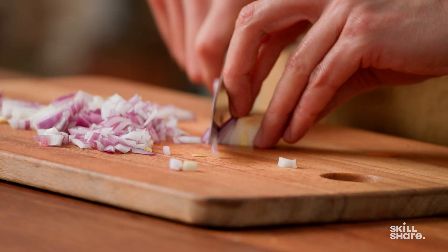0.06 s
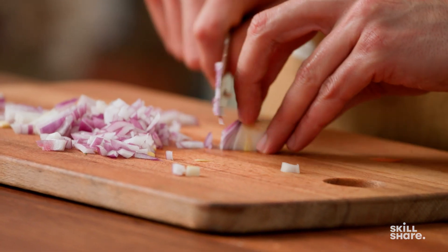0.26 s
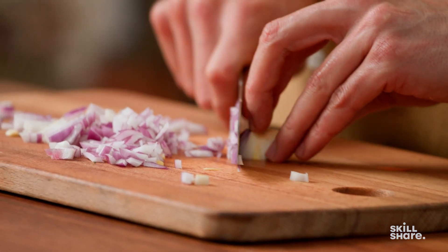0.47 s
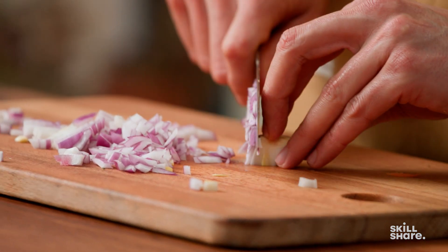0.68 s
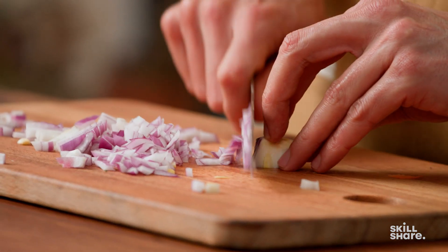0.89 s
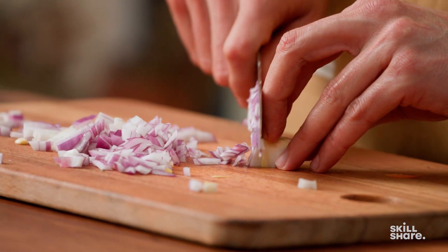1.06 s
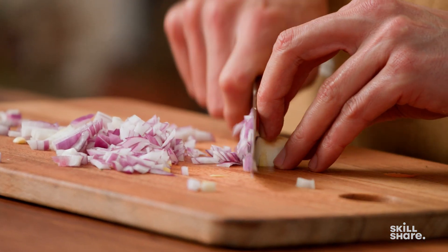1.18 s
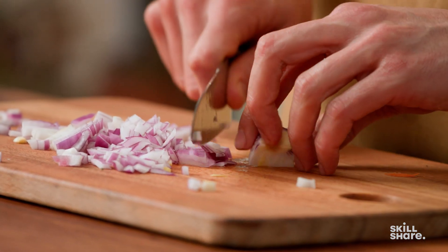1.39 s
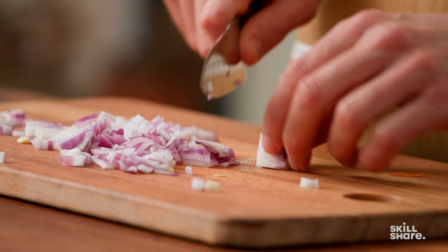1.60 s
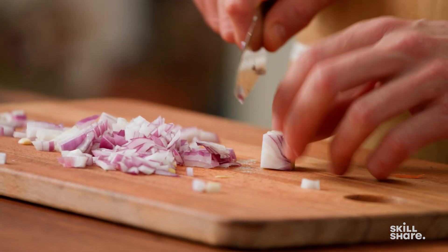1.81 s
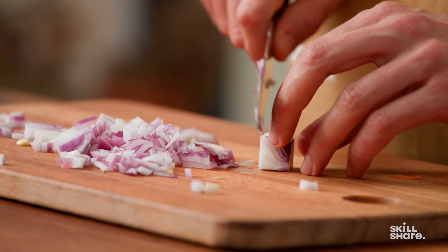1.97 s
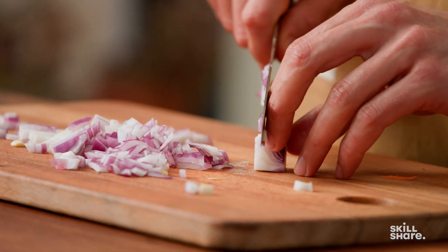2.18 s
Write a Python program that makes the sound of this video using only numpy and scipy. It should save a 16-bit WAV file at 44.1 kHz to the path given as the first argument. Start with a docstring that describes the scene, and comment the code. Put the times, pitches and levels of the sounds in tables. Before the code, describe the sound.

A knife chops an onion on a wooden board, heard close in a small live kitchen. Faint crackles at 0.1 s, then wet crunches swell into sharp, woody knocks at about 0.21, 0.58, 0.93 and 1.28 s, with low table thuds, weakest on the last, which has the hardest, brightest click. Short echoes fade; tiny crackles near 1.37 and 2.2 s over faint hiss and wavering rumble.

```python
"""Over a wavering low rumble and faint hiss, both filtered noise, a knife slices an onion in four strokes.
Before the first knock small crackles open the scene; others come between the strokes and after the last.
In each stroke the wet crunch, a dense train of clicks, swells while a low thud of two table modes starts.
Then tip and heel knock on the wooden board: two wavelets, a bright tick and ringing board modes.
After every knock come short echoes, a decaying diffuse tail and the resonances of a small live room."""
import sys
import numpy as np
from scipy import signal
from scipy.fft import rfft, irfft
from scipy.io import wavfile
from scipy.ndimage import uniform_filter1d

SR = 44100
rng = np.random.default_rng(int(sys.argv[2]) if len(sys.argv) > 2 else 0)


def waveform_to_disk(signal):
    """Save audio, clipped to [-1, 1], as 16-bit WAV at the path in sys.argv[1]."""
    frames = np.transpose(np.atleast_2d(signal))
    scaled = np.clip(frames, -1, 1) * 32767
    samples = np.round(scaled).astype(np.int16)
    wavfile.write(sys.argv[1], SR, samples)


N = 99225
T = np.arange(N) / SR  # time, s


def amp(db):
    """Decibel scale: 20 dB is a factor of ten in amplitude."""
    return 10 ** (np.asarray(db) / 20)


def unit(x):
    """Normalisation: scale to an rms of 1."""
    return x / np.sqrt(np.mean(x ** 2))


def at_hz(points, hz):
    """Logarithmic pitch axis: interpolate (pitch_hz, value) points along it."""
    pitch, value = np.array(points, float).T
    return np.interp(np.log(np.maximum(hz, 1)), np.log(pitch), value)


def convolve(x, response):
    """Linear superposition: every sample of x launches a copy of the response."""
    return signal.fftconvolve(x, response)[:N]


def colour(x, points, size=8192):
    """Minimum phase: a causal filter of unit power follows from the spectrum by folding its cepstrum."""
    log_gain = np.log(amp(at_hz(points, np.fft.rfftfreq(size, 1 / SR))))
    cepstrum = irfft(log_gain)
    cepstrum[1:size // 2] *= 2
    cepstrum[size // 2 + 1:] = 0
    response = irfft(np.exp(rfft(cepstrum)))
    return convolve(x, response / np.linalg.norm(response))


def decay(age, t60):
    """Exponential damping: the level falls 60 dB in t60 seconds."""
    return np.exp(-np.log(1000) * age / t60)


def ring(modes):
    """Modal superposition: an impulse response of damped cosines, cut off after a second."""
    t = T[T < 1]
    out = sum(amp(db) * decay(t, t60) * np.cos(2 * np.pi * hz * t) for hz, db, t60 in modes)
    return np.pad(out, (0, N - len(t)))


# The four strokes; the knife meets the board at start_s. Hardness 1 is a usual contact.
# Columns: start_s, knock_level_db, hardness (ratio), crunch_level_db, thud_level_db; levels are relative
CHOPS = [(0.2095, 1.5, 0.94, 5, -1.5), (0.5758, 1.54, 1.054, 6, -0.5), (0.9264, 0, 0.93, 3, -4.5),
         (1.2793, 1.5, 1.213, 3, -12)]
PUSH_S = 0.00006  # standard deviation of the push at hardness 1


def pushes():
    """Contact mechanics: each blow is a brief bell-shaped force, shorter for a harder contact."""
    force = np.zeros(N)
    for start, db, hardness, *_ in CHOPS:
        push = np.exp(-.5 * ((T - start) * hardness / PUSH_S) ** 2)
        force += amp(db) * push / push.sum()
    return force


# How well the board radiates. Columns: pitch_hz, level_db
WOOD = [(60, -29), (150, -15), (230, -12.5), (330, -1.5), (2600, 1), (3150, -11), (3700, -9), (4500, -11.5),
        (6500, -22)]


def wood(x):
    """Radiation efficiency: the board radiates neither deep bass nor treble well."""
    return irfft(rfft(x) * amp(at_hz(WOOD, np.fft.rfftfreq(N, 1 / SR))), N)


# Modes of the board. Columns: pitch_hz, level_db (relative), t60_s
BOARD = [(354.5, -15.5, 0.089), (468.2, -4, 0.042), (692.4, 14.5, 0.019), (900, 8, 0.021), (1066, 2, 0.11),
         (1277, -15, 0.15), (1410, -14, 0.08), (1646, 4, 0.0507), (1924, -10, .05), (1950, -13.5, 0.03),
         (2280, -10.5, 0.023), (2431, -5.5, 0.077), (2581.5, 5.5, 0.012), (2850, -51.5, 0.038)]
# Spectrum of the edge's tick. Columns: pitch_hz, level_db (relative, per Hz)
TICK = [(150, -8.5), (1000, -2), (3000, 1), (3600, 4.5), (4300, -1), (5200, -0.5), (10000, -6),
        (16000, -11)]
CLACK_HZ = 1209  # peak of the clack's spectrum at hardness 1
CLACK_DB, BOARD_DB = -8, -29.5
TIP_LEAD_S, TIP_DB = 0.0008945, -4.5  # the tip lands just before the heel, and softer
TICK_DB, TICK_HARD_DB = -47.5, 41  # level at hardness 1, and its growth per unit of hardness


def knocks(force):
    """Impact excitation: tip and heel clack on the wood, the edge ticks and the board's modes ring."""
    clack, tick = np.zeros(N), np.zeros(N)
    for start, db, hardness, *_ in CHOPS:
        tip = start - TIP_LEAD_S
        for when, gain in ((tip, amp(db + TIP_DB)), (start, amp(db))):
            # one short wavelet, a tall peak between two dips
            u = (np.pi * CLACK_HZ * hardness * (T - when)) ** 2
            clack += gain * (1 - 2 * u) * np.exp(-u)
        tick_gain = amp(db + TICK_HARD_DB * (hardness - 1))
        tick += tick_gain * np.sinc((T - tip) * SR)
    ringing = convolve(force, ring(BOARD))
    board = wood(amp(CLACK_DB) * clack + amp(BOARD_DB) * ringing)
    return board + amp(TICK_DB) * colour(tick, TICK)


# The blade sinks into the onion, one row for each stroke. Columns: start_s, rise_s
CUTS = [(0.172, 0.012), (0.528, 0.02), (0.858, 0.03), (1.222, 0.014)]
# Small crackles as blade and fingers press the onion. Columns: start_s, length_s, level_db (relative)
NICKS = [(0.1067, 0.017, -3.5), (0.1464, 0.026, -10.5), (0.4713, 0.011, -11), (0.516, 0.041, -21),
         (0.798, 0.042, -36.5), (0.848, 0.014, -18.5), (1.177, 0.16, -24), (1.374, 0.005, -20.5),
         (1.70, 0.049, -41.5), (2.202, 0.004, -27)]
CUT_START_DB, CUT_RISE_DB = -19.5, 13  # the crunch starts soft and swells by this much
CUT_STOP_S = 0.004  # time constant of the stop at the board
GRAINS_PER_S, GRAIN_SPREAD_DB = 4500, 2.5
LAYERS_PER_S, LAYER_DB = 180, 1.3  # random unevenness of the layers


def onion():
    """Granular fracture: cells burst in dense clicks that swell as the blade sinks and stop at the board."""
    pressure = np.zeros(N)
    for (start, rise), (end, _, _, db, _) in zip(CUTS, CHOPS):
        depth = np.clip((T - start) / rise, 0, 1)
        swell = amp(CUT_START_DB + CUT_RISE_DB * depth)
        stop = np.exp(-np.maximum(T - end, 0) / CUT_STOP_S)
        pressure += amp(db) * (T > start) * swell * stop
    for start, length, db in NICKS:
        pressure += amp(db) * (T > start) * np.exp(-((T - start) / length) ** 2)
    bursts = (rng.random(N) < GRAINS_PER_S / SR) * rng.choice([-1, 1], N)
    sizes = amp(GRAIN_SPREAD_DB * np.minimum(rng.exponential(size=N), 5))
    layer_steps = rng.standard_normal(N)
    layers = amp(LAYER_DB * np.interp(T * LAYERS_PER_S, np.arange(N), layer_steps))
    return pressure * layers * unit(bursts * sizes)


# Low modes of the table under the board. Columns: pitch_hz, level_db (relative), t60_s
TABLE = [(49.5, 3, 0.21), (113, -10, 0.51)]
THUD_LEAD_S, THUD_DB = 0.02, -46.5  # the thud starts before the knock


def thuds():
    """Low-frequency modal response: the weight of each stroke rocks the table."""
    out = np.zeros(N)
    for start, *_, thud_db in CHOPS:
        age = np.maximum(T - start + THUD_LEAD_S, 0)
        for hz, db, t60 in TABLE:
            gain = amp(THUD_DB + thud_db + db)
            out += gain * np.sin(2 * np.pi * hz * age) * decay(age, t60)
    return out


# First echoes from worktop and cook; a negative gain is the underside of the board.
# Columns: delay_s, gain (ratio)
ECHOES = [(0.0034, 0.071), (0.0051, -0.069), (0.0072, 0.2)]


def echoes(x):
    """Specular reflection: nearby surfaces throw the sound back within milliseconds."""
    return sum(gain * convolve(x, np.sinc((T - delay) * SR)) for delay, gain in ECHOES)


def even(x):
    """Spectral whitening: flatten the broad bumps of a spectrum and keep its fine structure."""
    spectrum = rfft(x)
    local_power = uniform_filter1d(np.abs(spectrum) ** 2, size=200)
    return irfft(spectrum / np.sqrt(local_power), N)


ROOM_GAP_S, ROOM_BUILD_S = 0.006, 0.011
ROOM_END_S = 0.35  # around here the last of the tail dies faster


def room_shape():
    """Growth of the sound field: it builds up after a short gap and dies away quickly at the end."""
    build = np.clip((T - ROOM_GAP_S) / ROOM_BUILD_S, 0, 1)
    return build * np.exp(-(T / ROOM_END_S) ** 4)


# Reverberation time before room_shape shortens the end. Columns: pitch_hz, t60_s
ROOM_T60 = [(150, 0.31), (1000, 0.41), (2700, 0.44), (4500, 0.33), (7000, .29), (14000, .22)]
# Spectrum of the diffuse tail. Columns: pitch_hz, level_db (relative, per Hz)
ROOM_COLOUR = [(100, 8), (300, 4), (600, 1), (1000, -1.5), (1600, 1.5), (2400, -6.5), (3300, 4), (4200, 7),
               (6500, -4.5), (15000, -7.5)]
ROOM_DB = -6


def kitchen(x):
    """Diffuse reverberation: noise bands decay at their own rates, the high treble fastest."""
    noise, hz = rfft(rng.standard_normal(N)), np.fft.rfftfreq(N, 1 / SR)
    centres = np.geomspace(100, 16000, 14)
    tail = np.zeros(N)
    for centre, share in zip(centres, np.eye(len(centres))):
        band = irfft(noise * np.interp(hz, centres, share), N)
        tail += band * decay(T, at_hz(ROOM_T60, centre))
    tail = even(tail * room_shape()) * (T < 1)
    return amp(ROOM_DB) * convolve(x, colour(tail / np.linalg.norm(tail), ROOM_COLOUR))


# Resonances of the room. Column: pitch_hz
ROOM_MODE_HZ = [617, 637, 684, 750, 901, 934, 1022, 1074, 1123, 1261, 1398, 1497, 1626, 1931]
# Their levels in the same order. Column: level_db (relative)
ROOM_MODE_DB = [-1, -5.5, -7.5, -4, 1, -1.5, 0.5, 0.5, -0.5, 0.5, -4.5, -7, -3.5, -9]
ROOM_MODES_DB, ROOM_MODE_T60_S = -40, 0.4  # decay before room_shape shortens the end


def room_resonances(force):
    """Standing waves: each push sets the room's modes ringing."""
    modes = ((hz, db, ROOM_MODE_T60_S) for hz, db in zip(ROOM_MODE_HZ, ROOM_MODE_DB))
    return amp(ROOM_MODES_DB) * convolve(force, ring(modes) * room_shape())


# Level of the deep rumble over time. Columns: time_s, level_db
RUMBLE = [(0, -49), (0.6, -65), (1.0, -51), (1.2, -60), (1.32, -47), (1.48, -44.5), (1.6, -53.5),
          (1.85, -68.5), (2.1, -69.5), (2.2, -59)]
# Spectrum of the rumble. Columns: pitch_hz, level_db (relative, per Hz)
RUMBLE_COLOUR = [(8, 1), (20, 0), (45, -14.5), (80, -29.5), (200, -58.5), (1000, -100)]
# Spectrum of the steady room noise. Columns: pitch_hz, level_db (relative, per Hz)
FLOOR = [(20, 0), (35, 5), (55, -7), (80, -17), (150, -19.5), (300, -28.5), (600, -34.5), (2400, -41),
         (4000, -46), (11000, -48), (15000, -52.5)]
FLOOR_DB = -62.5


def background():
    """Stationary and modulated noise: a steady room noise and a deep rumble that comes and goes."""
    rumble_gain = amp(np.interp(T, *np.array(RUMBLE).T))
    rumble = unit(colour(rng.standard_normal(N), RUMBLE_COLOUR)) * rumble_gain
    floor = unit(colour(rng.standard_normal(N), FLOOR))
    return rumble + amp(FLOOR_DB) * floor


# Spectrum of the crunch heard directly. Columns: pitch_hz, level_db (relative, per Hz)
CRUNCH = [(150, -23), (500, -10), (950, 3), (1500, -7), (2300, -5.5), (3600, -22.5), (5000, -19),
          (6400, -7), (7900, -16.5), (10100, -2), (12500, -20.5), (14100, -2.5), (16000, -13.5)]
# Spectrum of the crunch as it spreads into the room. Columns: pitch_hz, level_db (relative, per Hz)
CRUNCH_SPREAD = [(150, -18), (900, 0), (2300, -5.5), (3600, -17.5), (6400, -7), (8000, -9), (10200, -5.5),
                 (12500, -7), (16000, -8)]
CRUNCH_DB, CRUNCH_SPREAD_DB = -46, -48


def scene():
    """Direct and reverberant field: knocks and crunch, heard directly and through the room."""
    force, cells = pushes(), onion()
    knock = knocks(force)
    direct = knock + amp(CRUNCH_DB) * colour(cells, CRUNCH)
    spread = knock + amp(CRUNCH_SPREAD_DB) * colour(cells, CRUNCH_SPREAD)
    room = echoes(direct) + kitchen(spread) + room_resonances(force)
    return (direct + room + thuds() + background())[None]


TOP_HZ = 15900


def record(dry):
    """Band limitation: the recorder cuts the top with a steep elliptic low-pass."""
    low_pass = signal.ellip(10, .2, 70, TOP_HZ, fs=SR, output="sos")
    return signal.sosfilt(low_pass, dry)


dry = scene()
out = record(dry)
waveform_to_disk(out)
```